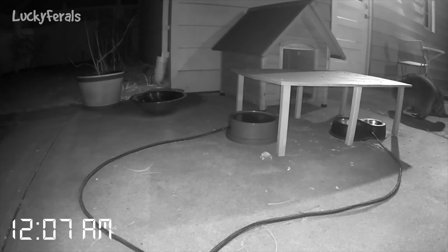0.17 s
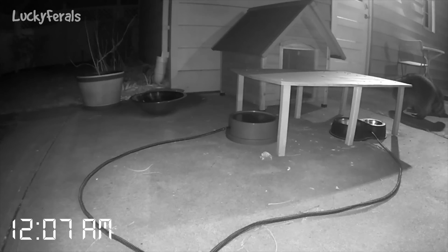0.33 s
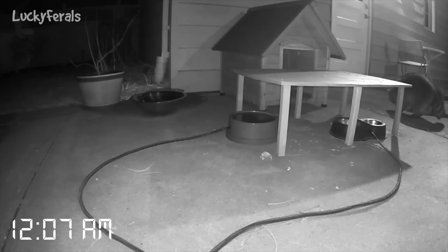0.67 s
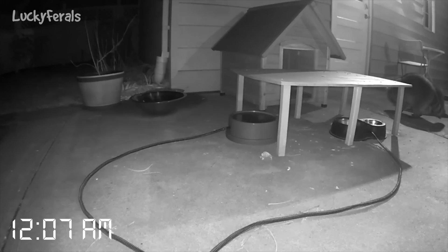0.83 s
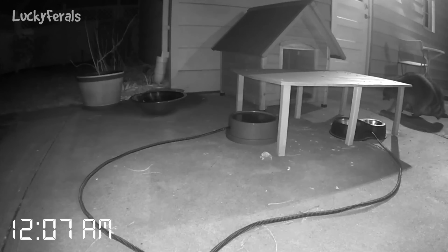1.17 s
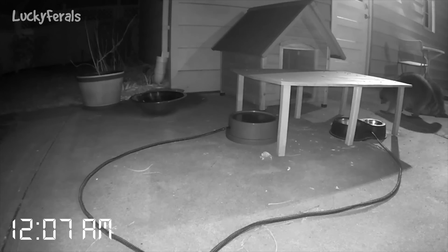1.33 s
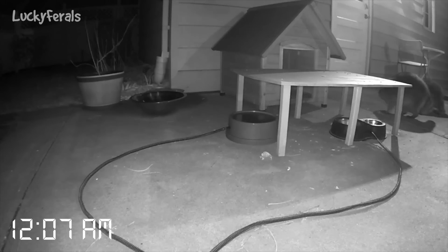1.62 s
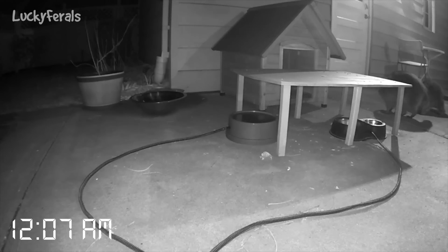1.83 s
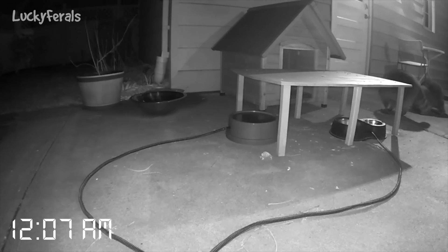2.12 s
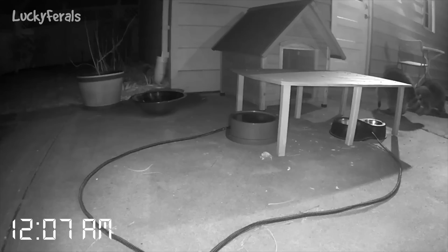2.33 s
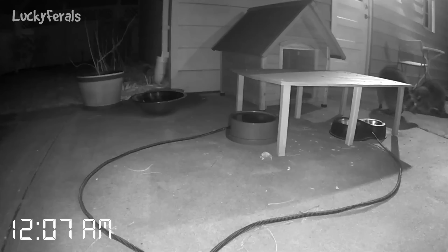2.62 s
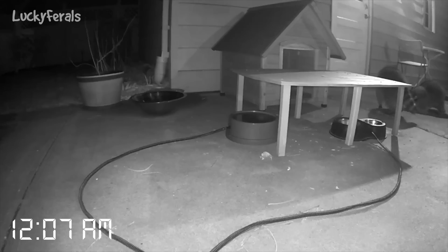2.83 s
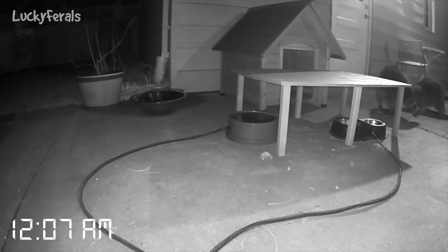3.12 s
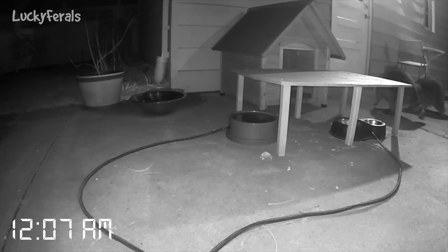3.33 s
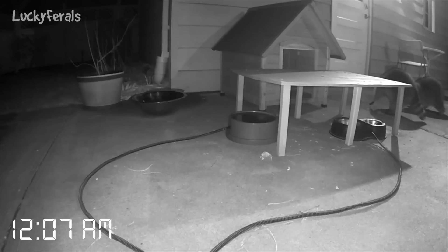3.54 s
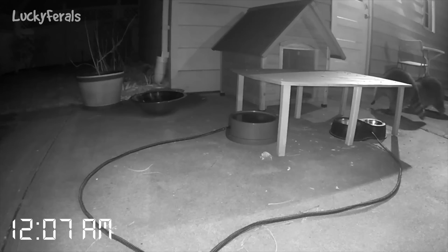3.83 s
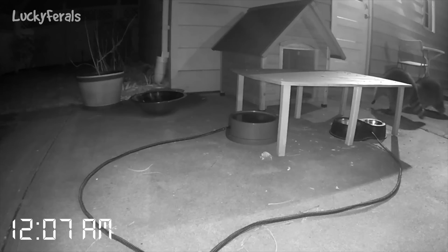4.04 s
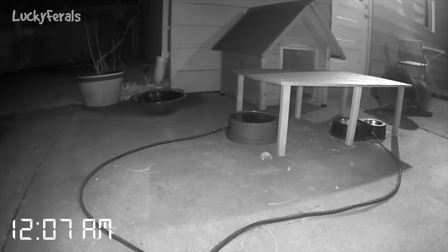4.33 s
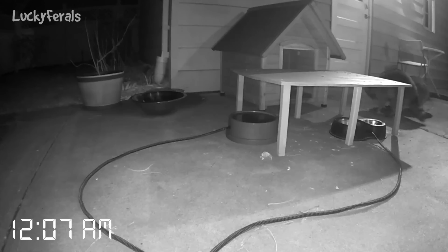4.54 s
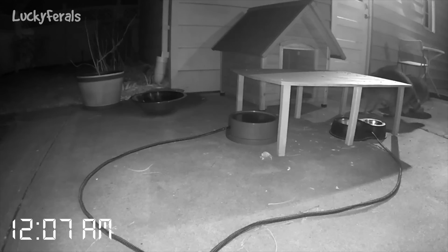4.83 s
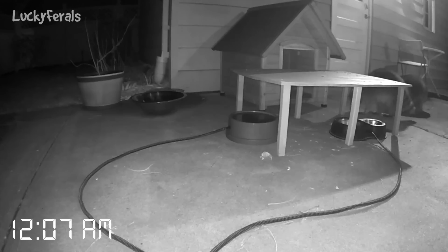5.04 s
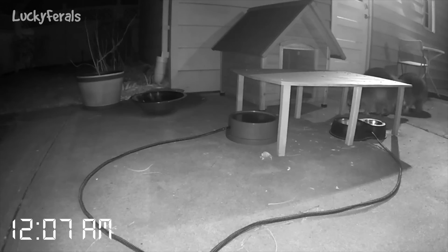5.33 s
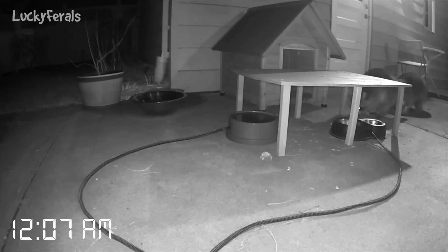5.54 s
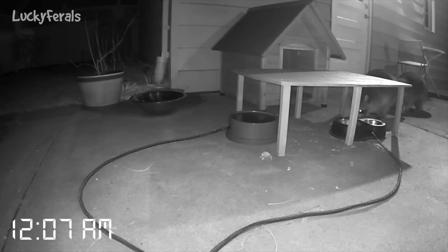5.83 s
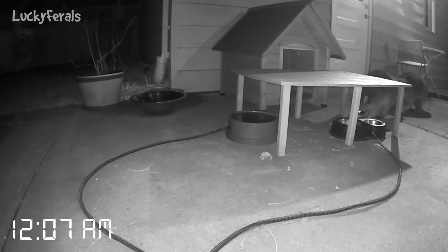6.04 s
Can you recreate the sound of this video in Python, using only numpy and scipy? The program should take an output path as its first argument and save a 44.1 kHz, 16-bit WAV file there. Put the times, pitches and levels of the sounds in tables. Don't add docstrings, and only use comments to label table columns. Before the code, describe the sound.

A raccoon chitters in three short raspy bursts on a patio at night, the last rising to a screech, over faint distant traffic.

```python
import sys
import numpy as np
from scipy import signal
from scipy.io import wavfile
from scipy.ndimage import uniform_filter1d

SR = 44100
rng = np.random.default_rng(int(sys.argv[2]) if len(sys.argv) > 2 else 0)


def log_audio(samples):
    frames = np.atleast_2d(samples).T
    limited = np.clip(frames, -1, 1)
    pcm = np.round(limited * 32767).astype(np.int16)
    wavfile.write(sys.argv[1], SR, pcm)


def field_ratio(decibels):
    return 10 ** (np.asarray(decibels, dtype=float) / 20)


N = 272626

# frequency in Hz, level in dB per Hz.
TRAFFIC_SPECTRUM = [(12, -43.5), (20, -12), (59, 4.5), (92, -5.5), (128, 0), (160, -6.5), (239, -11),
                    (375, -20), (415, -15.5), (533, -21), (815, -14.5), (1450, -19.5), (2850, -37.5),
                    (6520, -42), (7970, -53), (10400, -88), (17500, -120)]
TRAFFIC_DB = -46.5
# time in seconds, level in dB.
TYRE_ROAR = [(0, 1), (.8, 2.5), (1.6, 0), (2.4, 0), (3.199, 1), (3.9, -3), (4.4, 4.5), (5.0, 2), (5.6, 4.5),
             (6.18, -1)]
# start in seconds, end in seconds, start in Hz, end in Hz, level in dB.
ENGINE_NOTES = [
    (0.57, 2.2, 254, 213, -56),
    (.9, 3.3, 124, 130, -54),
    (0.74, 1.9, 445, 400, -65),
    (3.9, 6.18, 180, 256, -55.5),
    (4.35, 5.5, 440, 445, -59),
    (5.55, 6.18, 408, 425, -60),
    (4.4, 4.7, 373, 310, -57),
    (5.4, 6.18, 194.5, 217, -55),
    (0.95, 1.8, 189, 177, -55.5),
]
# delay in seconds, level in dB.
ECHOES = [(.0058, -9.5), (0.0099, -18), (.015, -14.5), (.02, -32), (.026, -29.5)]

# start in seconds, rise in seconds, fall in seconds, peak in dB, low thump in dB.
SNORTS = [(2.03, .005, 0.0089, -65, -75), (2.385, .004, .008, -76, -72.5),
          (3.085, 0.0044, 0.033, -54.5, -47.5), (3.1, 0.029, 0.014, -55.5, -67),
          (3.818, 0.024, 0.032, -65.5, -80), (3.955, .008, 0.014, -59, -79.5), (4, .01, 0.021, -55, -90),
          (4.929, 0.0032, .015, -55.5, -45), (4.94, 0.016, 0.084, -53, -62), (5.03, 0.085, 0.069, -65, -85),
          (5.864, 0.042, 0.014, -60, -80)]
# frequency in Hz, width in Hz, level in dB.
NOSTRIL = [(2080, 820, 1.5), (3900, 1100, -2.5), (4720, 1300, -5), (6400, 1800, -8.5)]

# frequency in Hz, width in Hz, level in dB.
OPEN = [(2640, 130, -9), (2970, 670, 8.5), (4110, 900, 8.5), (5400, 960, 0), (6870, 750, -8),
        (7800, 320, -14.5)]
SHUT = [(3210, 920, -5.5), (4450, 490, 6.5), (5480, 410, 3.5), (7000, 790, -21.5)]
HALF = [(2960, 390, -20), (4070, 410, 9), (5140, 400, -3), (6930, 700, -15)]
WIDE = [(3340, 380, -1), (4810, 1400, -8.5), (5400, 1200, -5), (6540, 1400, -14.5)]
SNARL = [(3550, 340, 8.5), (4300, 220, -0.5), (5490, 500, -24), (6590, 1000, -3.5)]
LOW = [(3110, 400, 9), (4430, 940, -2), (5460, 730, 9.5), (6400, 340, -17)]
BARED = [(2810, 560, -18), (4830, 1200, -12), (5200, 2100, -16.5), (6430, 1100, -9.5)]

# start in seconds, full in seconds, release in seconds, end in seconds, level in dB.
BREATH = [
    (0.382, 0.477, .68, .86, -44),
    (2.4, 2.52, 2.68, 3.0, -55),
    (4.07, 4.145, 4.6, 4.82, -46),
]
# start in seconds, length in seconds, start in Hz, end in Hz, peak in dB.
SQUEAL = [
    (4.136, 0.035, 1139, 1167, -29.5),
    (4.166, .026, 1130, 1197, -26.5),
    (4.196, .021, 1069, 834, -32),
    (4.224, .026, 1021, 1048, -31),
    (4.25, .027, 1121, 1204, -24),
    (4.281, .018, 1104, 1226, -44.5),
]
DOUBLED = [
    (4.302, .034, 1127, 1424, -30.5),
    (4.33, .045, 1340, 1260, -44),
    (4.353, .023, 1082, 1263, -33.5),
    (4.378, 0.039, 1108, 1183, -45),
    (4.487, 0.026, 1145, 1090, -43.5),
    (4.53, 0.012, 1170, 1120, -41),
]

# start in seconds, effort in dB, strongest partial in Hz, length in seconds.
SQUEAKS = [
    (.4135, -26.5, 2050, 0.015),
    (.4343, -29, 2085, .012),
    (.4454, -19, 2262, 0.016),
    (.4657, -38.5, 2155, .013),
]
RASPS = [
    (.4865, -18, 1920, 0.018),
    (.5164, -21.5, 1900, 0.019),
    (.5354, -41, 1960, 0.021),
    (.561, -36, 1980, .011),
    (.595, -23.5, 1883, 0.012),
    (.6425, -25.5, 1898, 0.013),
    (.6828, -18, 1959, 0.015),
]
MUTTERS = [
    (.388, -31.5, 1754, .009),
    (.7328, -22.5, 2015, 0.012),
    (.7419, -26.5, 2450, .009),
    (.7809, -34, 2040, 0.0049),
    (.7881, -25, 1946, 0.0061),
]
PEEPS = [
    (2.4204, -26, 1954, 0.0073),
    (2.4267, -28, 2155, 0.0085),
    (2.4444, -40.5, 2260, 0.012),
]
TICKS = [(2.5024, -22, 2072, .013), (2.5112, -21.5, 2002, 0.0019), (2.5421, -29, 1930, 0.0041),
         (2.5865, -24, 1914, 0.0052), (2.6219, -24.5, 1953, 0.0081), (2.6628, -22.5, 2035, 0.0035),
         (2.6964, -42, 1960, .0071), (2.7372, -19, 1953, 0.0039), (2.8534, -31.5, 2080, 0.0062),
         (2.8904, -40, 2030, 0.013), (2.9317, -22.5, 1998, 0.0032)]
PIPS = [(.8839, -45.5, 2100, 0.011), (2.4055, -28, 1780, 0.0034), (2.4668, -35, 1780, .0057),
        (2.814, -39, 1980, 0.0049), (2.9771, -47, 2050, .0065), (3.0909, -27, 2140, .008),
        (3.9554, -41, 1995, 0.0065), (4.0038, -35.5, 1964, .0098), (4.7122, -32.5, 1866, 0.0079),
        (4.9318, -26.5, 2163, 0.0083), (4.9524, -42, 2200, 0.013), (4.9744, -39.5, 2134, 0.0061)]
CRACKS = [
    (4.0751, -20.5, 1687, 0.015),
    (4.0902, -32.5, 1720, 0.022),
    (4.1099, -11.5, 2146, 0.0051),
    (4.1154, -16.5, 2124, 0.01),
]
WHINES = [
    (4.3127, -27, 1930, 0.017),
    (4.3207, -17, 1979, 0.018),
    (4.3567, -18.5, 1776, 0.012),
    (4.3779, -34.5, 1765, .01),
    (4.392, -35, 1740, 0.0072),
]
GRUNTS = [
    (4.4195, -18.5, 1790, 0.017),
    (4.4505, -35, 1746, 0.0091),
    (4.466, -36.5, 2037, 0.0074),
    (4.4915, -18.5, 1886, .012),
]
FADING = [
    (4.5339, -19.5, 1750, 0.0086),
    (4.5422, -21.5, 1986, 0.0037),
    (4.5749, -21.5, 2066, .009),
    (4.6184, -20, 1950, .009),
    (4.6592, -27.5, 1990, 0.0096),
    (4.7499, -20.5, 2103, 0.0061),
]
# start in seconds, effort in dB, chest partial in Hz, length in seconds.
SCREECH = [
    (4.119, -23.5, 1317, 0.027),
    (4.1376, -19.5, 1280, .015),
    (4.1454, -18.5, 1320, 0.034),
    (4.172, -25, 982, 0.022),
    (4.176, -20, 1336, 0.03),
    (4.202, -26, 1062, 0.01),
    (4.218, -29.5, 1147, 0.03),
    (4.244, -29, 1247, .016),
    (4.264, -29, 1286, 0.029),
]

# syllables, pitch multiple at the mouth, roughness 0 to 1, rise in seconds,
# glide, mouth width in Hz, nose in dB, chest in dB, chest to mouth frequency ratio, posture.
VOICES = [
    (SQUEAKS, 2, .13, .005, .03, 620, -3, -10, .53, OPEN),
    (PEEPS, 2, .14, .003, .04, 620, -16, -6, .53, SHUT),
    (RASPS, 4, .28, .004, .011, 450, -2.5, -23, .53, OPEN),
    (MUTTERS, 4, .45, .004, .011, 600, -14, -20, .53, HALF),
    (TICKS, 2, .33, .0035, .03, 470, -12.5, -17, .53, SHUT),
    (PIPS, 2, .3, .0035, .04, 560, -33, -21, .53, SHUT),
    (CRACKS, 4, .4, .0015, .011, 680, -12, -10.5, .66, WIDE),
    (WHINES, 3, .3, .008, .021, 560, -6, -26, .53, SNARL),
    (GRUNTS, 4, .4, .009, .011, 650, -11, -19, .53, LOW),
    (FADING, 4, .31, .0055, .011, 600, -11, -33, .53, BARED),
]
NOSE_LAG, CHEST_LAG, USUAL_EFFORT_DB = 0.48, 0.6, -24.5
EDGE_HZ = 7770


def evened(x):
    return x / np.sqrt(np.mean(x ** 2) + 1e-20)


def peaked(x):
    return x / np.sqrt(2 * uniform_filter1d(x ** 2, size=90).max() + 1e-20)


def clumping(noise, size, depth_db):
    return field_ratio(depth_db * evened(uniform_filter1d(noise, size=size)))


def add(mix, start_s, sound):
    part = mix[round(start_s * SR):][:len(sound)]
    part += sound[:len(part)]


def resonate(x, hz, width_hz):
    turn = np.exp(2j * np.pi * np.cumsum(hz * np.ones(len(x))) / SR)
    r = np.exp(-np.pi * width_hz / SR)
    once = signal.lfilter([1 - r], [1, -r], x / turn)
    twice = signal.lfilter([1 - r], [1, -r], once)
    return 2 * (turn * twice).real


def bank(x, modes):
    return sum((-1) ** k * field_ratio(db) * resonate(x, hz, width_hz) for k, (hz, width_hz, db) in enumerate(modes))


def traffic():
    frames, hz = N // 512 + 5, np.fft.rfftfreq(2048, 1 / SR)
    real, imag, patches = rng.standard_normal((frames, 1025, 3)).T
    patches = uniform_filter1d(patches, size=16, axis=0)
    patches = evened(uniform_filter1d(patches, size=12, axis=1))
    swell = evened(uniform_filter1d(rng.standard_normal(frames), size=40))
    table_hz, table_db = np.transpose(TRAFFIC_SPECTRUM)
    shape_db = np.interp(np.log(hz + 1), np.log(table_hz + 1), table_db)
    roar_db = np.interp(np.arange(frames) * 512 / SR, *np.transpose(TYRE_ROAR))
    roar_db = roar_db * np.exp(-(np.log((hz[:, None] + 1) / 350) / .7) ** 2)
    level_db = shape_db[:, None] + roar_db + .8 * patches + .5 * swell
    spectra = (real + 1j * imag) * field_ratio(level_db)
    return field_ratio(TRAFFIC_DB) * evened(signal.istft(spectra, nperseg=2048, noverlap=1536)[1][:N])


def engines():
    out = np.zeros(N)
    for start_s, end_s, start_hz, end_hz, db in ENGINE_NOTES:
        t = np.arange(start_s, end_s, 1 / SR)
        waver = evened(uniform_filter1d(rng.standard_normal(110000), size=6000))[:len(t)]
        tone = np.sin(2 * np.pi * np.cumsum(np.linspace(start_hz, end_hz, len(t))) / SR)
        add(out, start_s, field_ratio(db + 1.1 * waver) * tone * signal.windows.tukey(len(t), .6))
    return out


def patio(x):
    taps, t = np.zeros(16000), np.arange(16000) / SR
    at = np.arange(400, 15900, 20) + rng.integers(0, 20, 775)
    taps[at] = rng.choice([-1., 1.], len(at))
    taps *= field_ratio(-60 * t / .13) + field_ratio(-22 - 60 * t / .5)
    taps *= field_ratio(-10) / np.linalg.norm(taps)
    for delay_s, db in ECHOES:
        taps[round(delay_s * SR)] += field_ratio(db)
    dull = .6
    return x + signal.oaconvolve(x, signal.lfilter([1 - dull], [1, -dull], taps))[:N]


def snorts():
    out, t = np.zeros(N), np.arange(15000) / SR
    for start_s, rise_s, fall_s, db, thump_db in SNORTS:
        air, clumps = rng.standard_normal((2, len(t)))
        air = air * clumping(clumps, 200, 1.4)
        flow = np.minimum(t / rise_s, 1) * np.exp(-np.maximum(t - rise_s, 0) / fall_s)
        thump = evened(resonate(air, 590, 260) + .6 * resonate(air, 1100, 900))
        thump = thump * np.minimum(t / .004, 1) * np.exp(-t / .022)
        hiss = flow * evened(bank(air, NOSTRIL))
        add(out, start_s, field_ratio(db) * hiss + field_ratio(thump_db) * thump)
    return out


def breath():
    out, faint_db = np.zeros(N), -10.5
    for (*times_s, db), nose in zip(BREATH, (OPEN, NOSTRIL, BARED)):
        t = np.arange(times_s[0], times_s[-1], 1 / SR)
        air, clumps = rng.standard_normal((2, SR))[:, :len(t)]
        air = air * clumping(clumps, 250, 3.0)
        hiss = evened(resonate(air, 2040, 950)) + field_ratio(-3.5) * evened(bank(air, nose))
        leak_db = db - 7.0 + np.interp(t, times_s, [faint_db, 0, 0, faint_db])
        add(out, times_s[0], field_ratio(leak_db) * hiss * signal.windows.tukey(len(t), .08))
    return out


def squeal():
    out = np.zeros(N)
    for rows, arch, half_db, third_db in ((SQUEAL, .12, -30, -14), (DOUBLED, .015, -11, -6)):
        for start_s, length_s, start_hz, end_hz, db in rows:
            u = np.arange(0, 1, 1 / (length_s * SR))
            hz = (start_hz + (end_hz - start_hz) * u) * (1 + arch * np.sin(np.pi * u))
            flutter = evened(uniform_filter1d(rng.standard_normal(2400), size=90))[:len(u)]
            half = np.pi * np.cumsum(hz * (1 + 0.013 * flutter)) / SR
            tone = np.sin(2 * half) + field_ratio(half_db) * np.sin(half) + field_ratio(third_db) * np.sin(3 * half)
            add(out, start_s, field_ratio(db + 2.8 * flutter) * tone * signal.windows.tukey(len(u), .7))
    return out


def syllable(db, pitch_hz, mouth_hz, chest_hz, nose_db, chest_db, length_s, rough, rise_s, glide,
             mouth_width_hz, nose):
    t = np.arange(3000) / SR
    noise, wobble, clumps = rng.standard_normal((3, len(t)))
    u = t / (np.clip(length_s, .002, .04) + rise_s)
    bend = 1 + glide * (np.minimum(u, 1.5) - .5)
    jitter = 1 + 0.05 * rough * evened(uniform_filter1d(wobble, size=60))
    turns = np.cumsum(pitch_hz * bend * jitter) / SR
    folds = sum(np.cos(2 * np.pi * k * turns) * (k * pitch_hz < EDGE_HZ) for k in range(1, 16))
    puffs = (1.4 + np.exp(-(turns % 1) / 2.7)) * noise * clumping(clumps, 110, 3.1)
    push = np.sin(np.pi / 2 * np.minimum(t / rise_s, 1)) ** 2 * np.exp(-1.1 * u ** 3)
    drive = push * (np.sqrt(1 - rough) * evened(folds) + 2.2 * np.sqrt(rough) * evened(puffs))

    mouth = peaked(resonate(drive, mouth_hz * bend, mouth_width_hz))
    chest = field_ratio(chest_db) * peaked(resonate(drive, chest_hz, 520))
    shifts = rng.standard_normal((len(nose), 2))
    shifted = [(hz * (1 + .03 * a), width_hz, level_db + 2.5 * b)
               for (hz, width_hz, level_db), (a, b) in zip(nose, shifts)]
    voice = mouth - chest + field_ratio(nose_db + 0.5) * peaked(bank(drive, shifted))
    small_head = signal.butter(N=3, Wn=800, btype="high", fs=SR)
    return field_ratio(db - 5.5) * signal.lfilter(*small_head, voice)


def raccoon():
    out = squeal() + breath()
    for rows, order, rough, rise_s, glide, width_hz, nose_db, chest_db, chest_ratio, nose in VOICES:
        for start_s, db, hz, length_s in rows:
            extra_db = db - USUAL_EFFORT_DB
            call = syllable(db, hz / order, hz, hz * chest_ratio, nose_db - NOSE_LAG * extra_db,
                            chest_db - CHEST_LAG * extra_db, length_s, rough, rise_s, glide, width_hz, nose)
            add(out, start_s - .4 * rise_s, call)
    for start_s, db, hz, length_s in SCREECH:
        nose_db = -8.0 - NOSE_LAG * (db - USUAL_EFFORT_DB)
        call = syllable(db, hz / 2, 1830, hz, nose_db, -7.5, length_s, rough=0.77, rise_s=0.0035,
                        glide=.0087, mouth_width_hz=820, nose=WIDE)
        add(out, start_s - .002, call)
    return out


def scene():
    return (patio(raccoon() + snorts()) + traffic() + engines())[None]


def band_limit(x):
    return signal.sosfilt(signal.butter(12, 8120, fs=SR, output="sos"), x)


def record(dry):
    band = signal.firwin(101, EDGE_HZ, window=("kaiser", 8), fs=SR)
    mix = signal.oaconvolve(dry, band[None], "same") + .0008
    return band_limit(mix)


dry = scene()
out = record(dry)
log_audio(out)
```